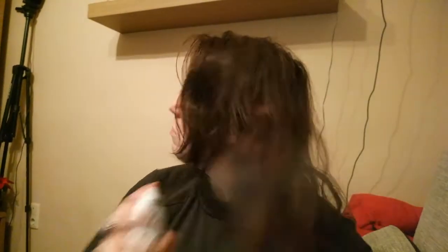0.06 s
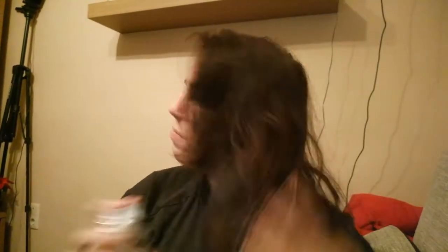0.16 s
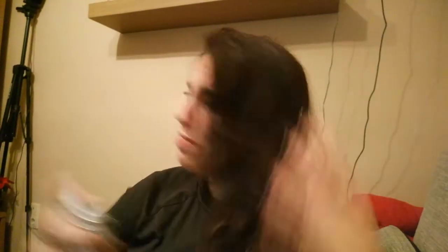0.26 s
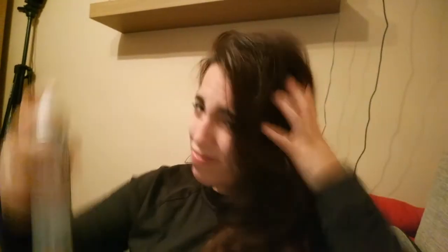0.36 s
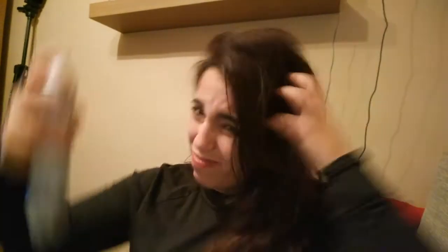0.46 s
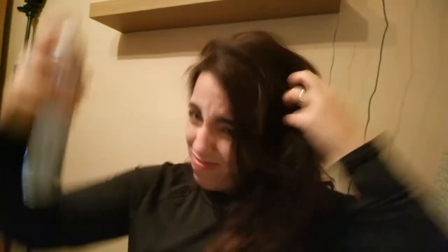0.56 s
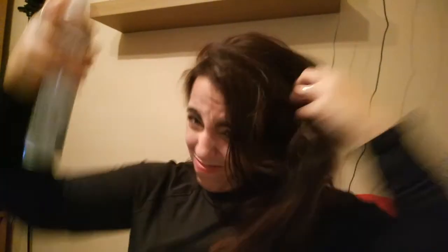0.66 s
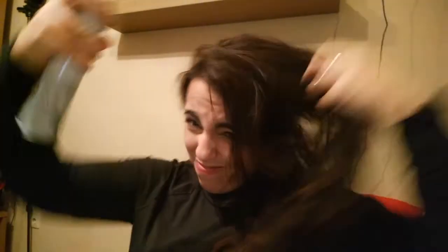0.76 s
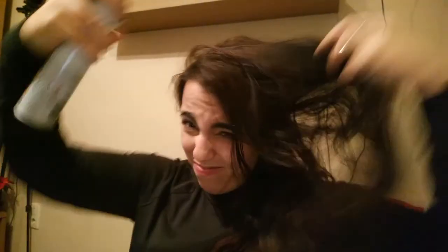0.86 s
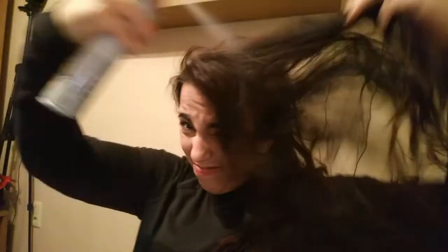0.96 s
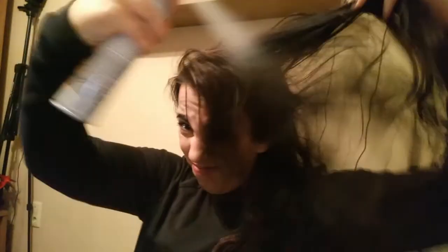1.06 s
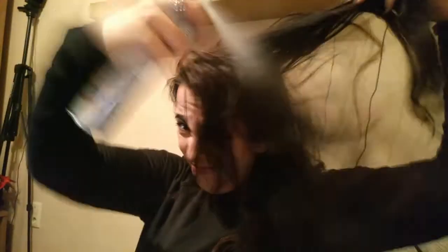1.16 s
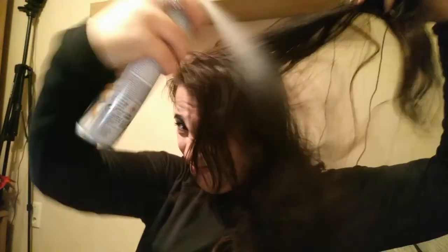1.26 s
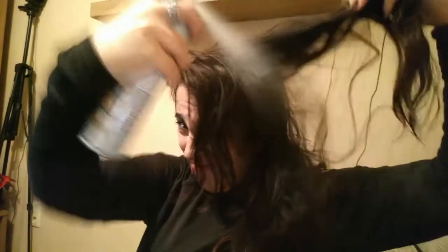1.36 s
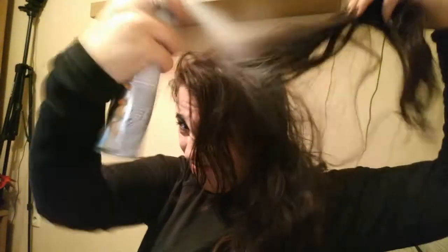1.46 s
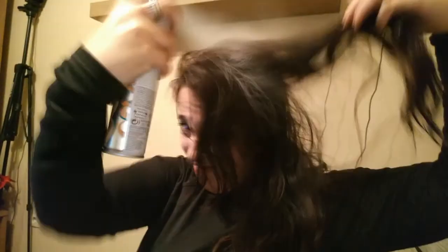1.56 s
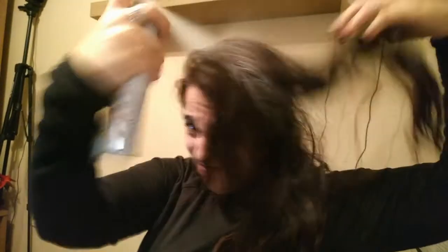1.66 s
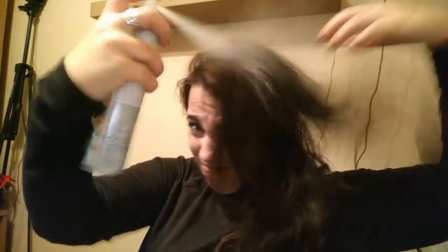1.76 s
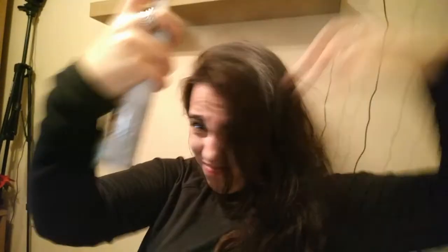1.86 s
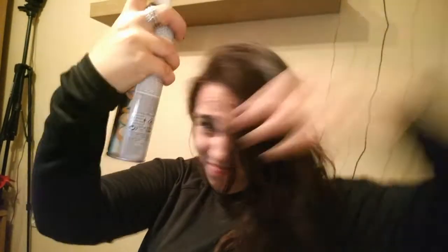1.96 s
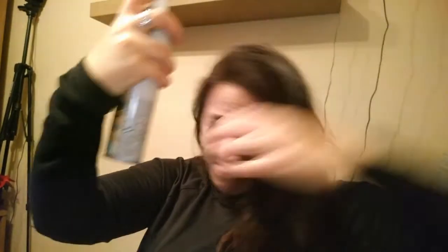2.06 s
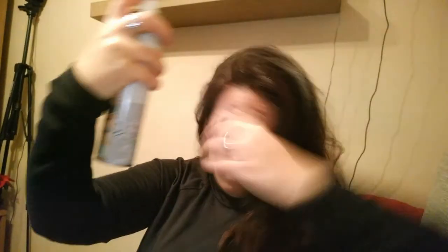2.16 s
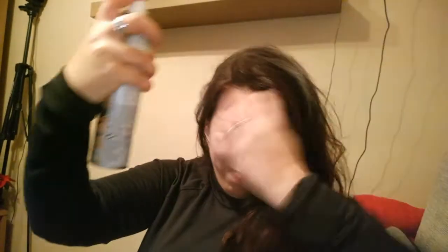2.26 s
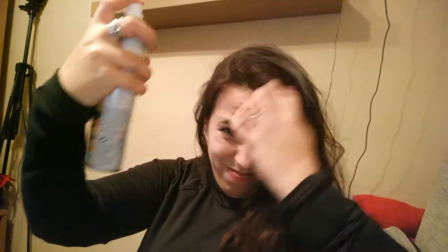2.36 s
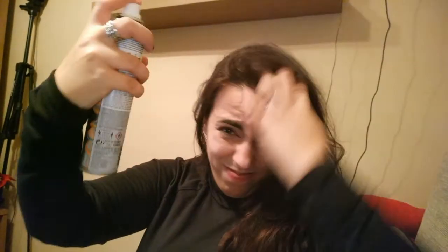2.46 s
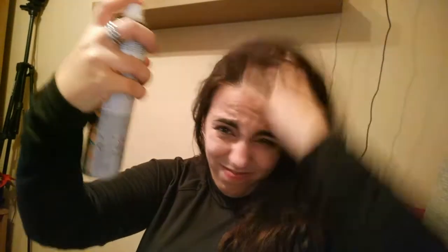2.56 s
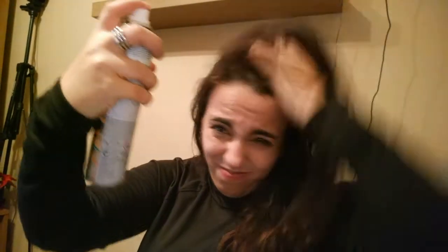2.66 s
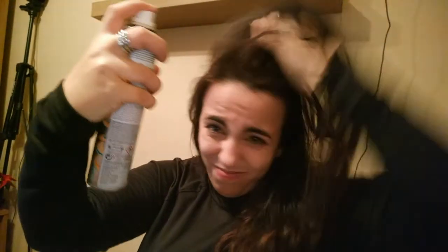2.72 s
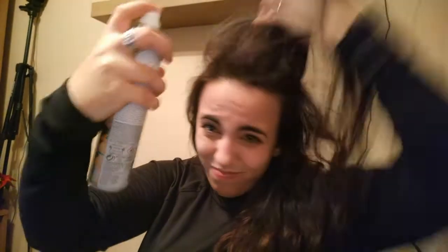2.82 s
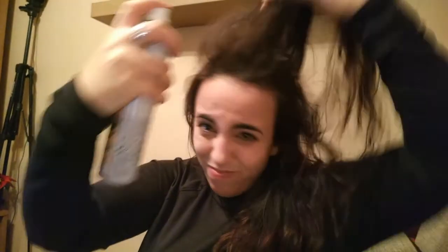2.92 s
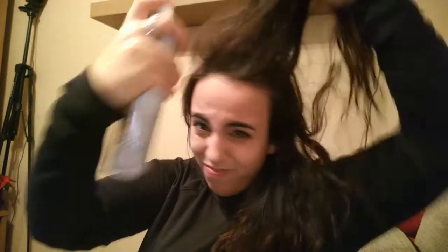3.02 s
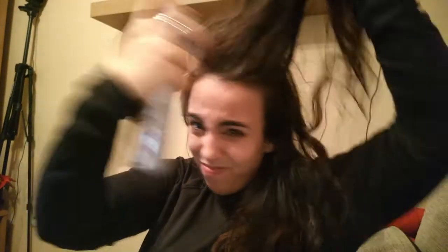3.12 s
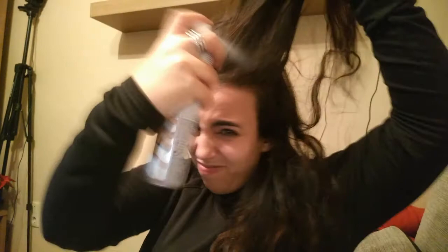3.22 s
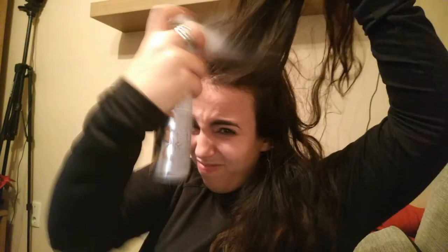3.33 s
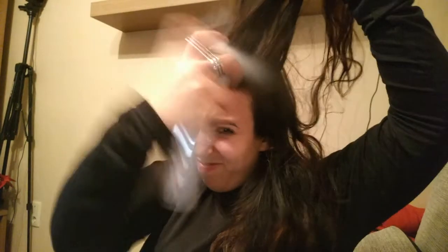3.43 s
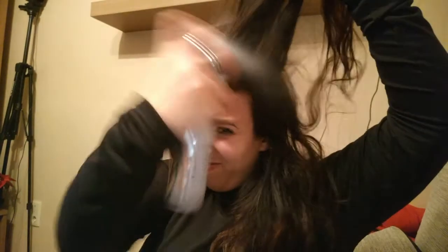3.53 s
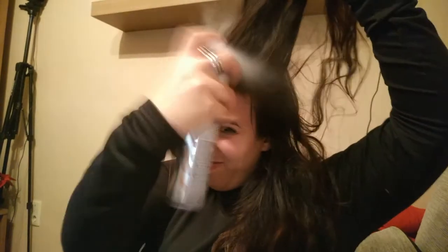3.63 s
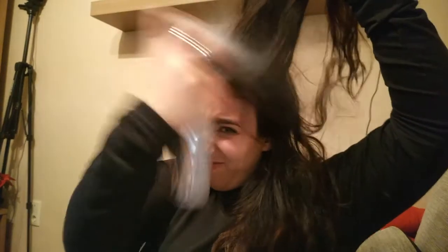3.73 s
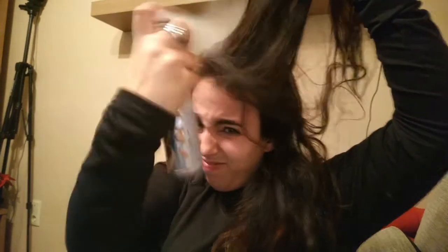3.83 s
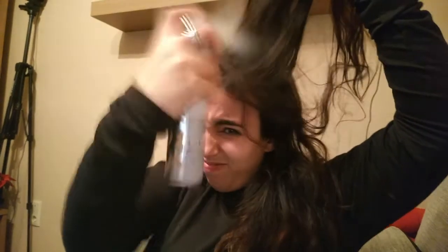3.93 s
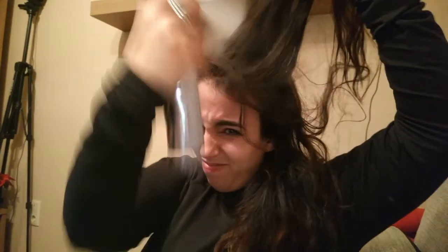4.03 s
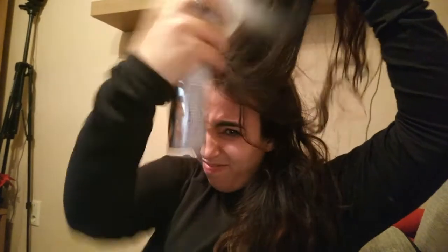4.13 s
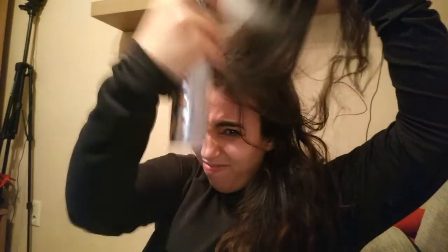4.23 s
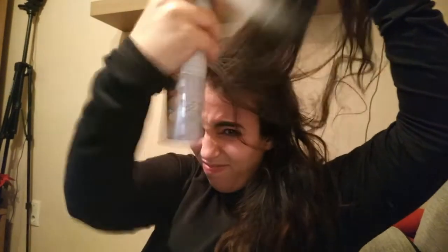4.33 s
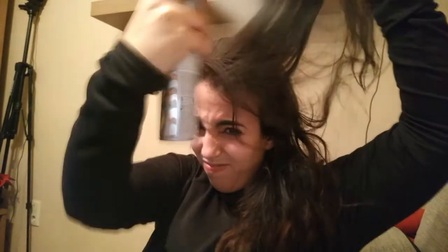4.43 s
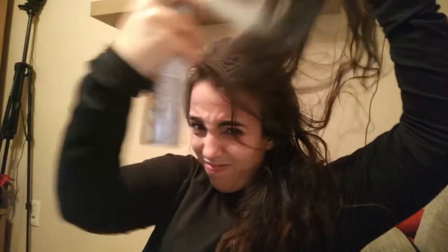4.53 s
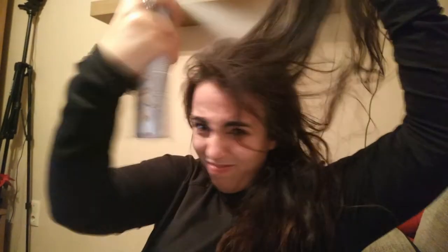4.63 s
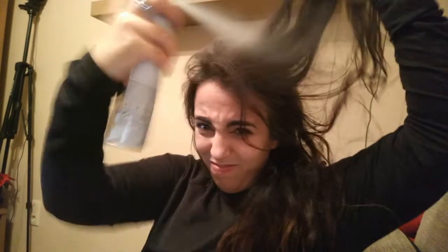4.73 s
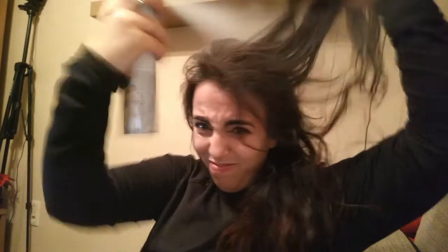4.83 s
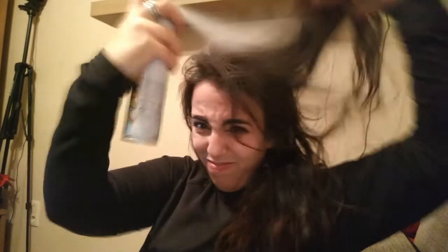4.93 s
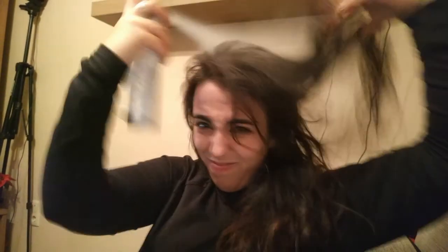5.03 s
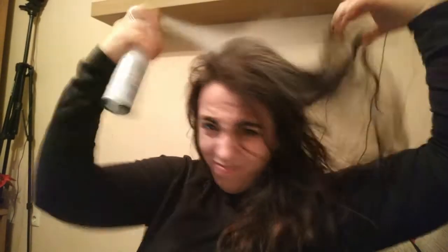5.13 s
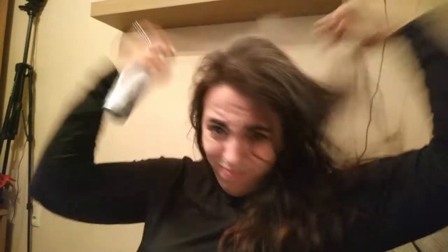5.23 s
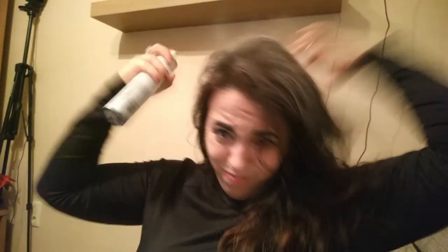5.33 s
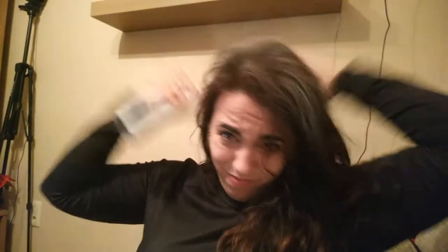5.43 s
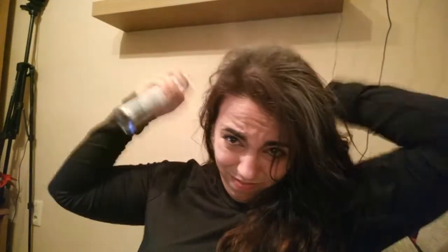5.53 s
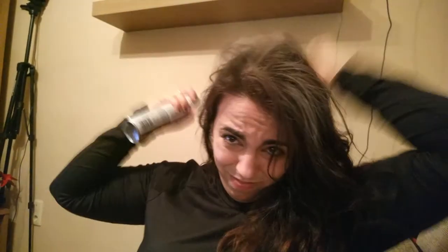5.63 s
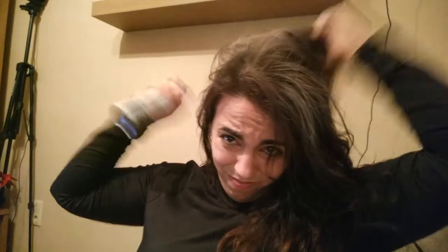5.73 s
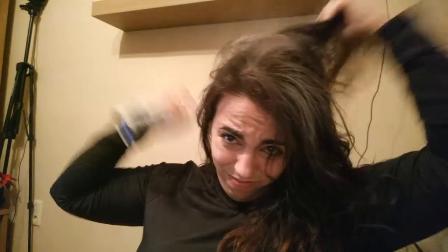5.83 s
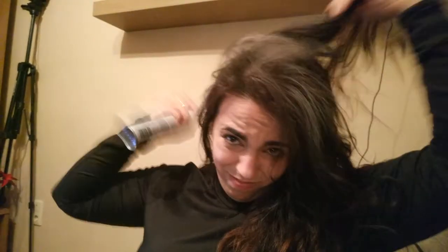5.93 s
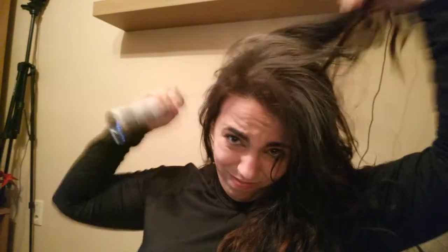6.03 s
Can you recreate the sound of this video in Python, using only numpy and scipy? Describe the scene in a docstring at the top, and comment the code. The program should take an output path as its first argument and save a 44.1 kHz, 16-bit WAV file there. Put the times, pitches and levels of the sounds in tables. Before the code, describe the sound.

In a small furnished room, an aerosol can hisses for under a second, spits once from its nozzle, then sprays long and steadily to the end.

```python
"""The echoes of a spray die away first; an aerosol can then sprays again in a small furnished room,
spits once from its nozzle and sprays a third time, up to the end, over a faint hush and thin fan tones.
Turbulent hiss is noise shaped by eddy size, sounded from several places along the plume; the hum is noise
through resonances of the air in the can. Decaying noise serves as the echoes that two ports receive
beside the direct sound; a sleeve, slaps of liquid and low flutter are noises under short envelopes."""
import sys
import numpy as np
from scipy import signal
from scipy.fft import rfft, irfft, next_fast_len
from scipy.io import wavfile
from scipy.ndimage import uniform_filter1d

SR = 44100
rng = np.random.default_rng(int(sys.argv[2]) if len(sys.argv) > 2 else 0)


def waveform_to_disk(signal):
    """Save audio, clipped to [-1, 1], as 16-bit WAV at the path in sys.argv[1]."""
    frames = np.transpose(np.atleast_2d(signal))
    scaled = np.clip(frames, -1, 1) * 32767
    samples = np.round(scaled).astype(np.int16)
    wavfile.write(sys.argv[1], SR, samples)


N = 268128
LEAD = int(.4 * SR)  # samples computed ahead of the audible start, and the length of the echoes
LONG = next_fast_len(N + LEAD)
TIME = (np.arange(LONG) - LEAD) / SR  # s from the audible start
HZ = np.maximum(np.fft.rfftfreq(LONG, 1 / SR), 1)
SIDES = np.array([[1], [-1]])  # left, right

# Small eddies at the nozzle. Each row: frequency in Hz, relative density in dB.
SMALL_EDDIES = [(5000, -41.5), (7000, -12), (8200, -6), (9000, -1), (9900, 1.5), (10600, -0.5),
                (12300, -4.5), (15100, -4.5), (16500, -7)]
# Large eddies down the plume. Each row: frequency in Hz, relative density in dB.
LARGE_EDDIES = [(60, -51), (110, -37), (206, -19), (340, -15), (820, -5), (1150, -9.5), (2000, -5.5),
                (3500, -5), (5400, -4), (7000, -.5), (8500, -4), (10500, -7), (13000, -14.5),
                (16500, -18.5)]
# Colouring by surfaces near by. Each row: centre in Hz, width in Hz, gain in dB.
SURFACE_RIPPLE = [(1450, 260, 3.5), (2010, 230, 4), (2733, 85, -4), (3650, 800, 3), (4540, 720, 2)]
# Resonances of the air in the can, before the hum is repitched. Each row: centre in Hz, width in Hz,
# relative gain in dB.
CAN_AIR = [(820, 95, 0), (680, 110, -11), (960, 120, -12)]
# Presses of the button. Each row: valve cracks in seconds, first flow in dB, valve opens fully in seconds,
# finger lifts in seconds, full-flow fine hiss in dB.
BUTTON_PRESSES = [(-.9, -26, -.8, -.04, -24.5), (.934, -26, .997, 1.8, -20.4),
                  (3.103, -38, 3.174, 6.3, -19.3)]
# Where the waved can points. Each row: time in seconds, dulling of the coarse hiss as it turns away in dB,
# left minus right in dB, hum pitch in Hz, level of the lower treble in dB.
CAN_AIM = [(-.1, 3, 5, 820, 1), (.95, 1, 4, 820, 0), (1.05, 2, 2, 830, 0), (1.3, 0, 1, 825, 0),
           (1.6, 2, 1.5, 840, -1), (1.85, 1.5, 2.5, 820, -1), (3.1, -1, 5, 820, 0), (3.25, .5, 0, 825, 0),
           (3.5, 0, -.5, 835, -.5), (3.75, .5, -.5, 785, 0), (3.98, 1, -.5, 850, .5),
           (4.15, 3, -1, 740, .5), (4.3, 2.5, -.5, 780, .5), (4.45, 2, -.5, 840, 0),
           (4.9, 2.5, .5, 845, -.5), (5.15, 6.5, -.5, 790, -1), (5.4, 7, 0, 820, -5), (5.55, 8, 1, 790, -7),
           (5.8, 8.5, 1, 795, -5), (6.1, 8.5, 1.5, 820, -4)]
# Bands of the coarse hiss. Each row: lower edge in Hz, upper edge in Hz, dB lost per dB of dulling,
# own flicker in dB.
COARSE_HISS_BANDS = [(20, 1100, 1., 1.), (1100, 2200, 1.2, 1.2), (2200, 4400, .9, .8),
                     (4400, 6600, .55, 1.)]
# Likeness of the echoes at the two ports. Each row: frequency in Hz, left-right correlation.
ECHO_LIKENESS = [(60, .4), (130, 0.72), (290, 0.98), (640, 0.77), (1400, 0.63), (3100, 0.5), (6800, 0.25),
                 (15000, .02)]
# The ports face different ways. Each row: frequency in Hz, left minus right in dB.
PORT_LEVELS = [(60, 0), (200, -13), (700, -5.5), (1300, -10.5), (2400, -5), (4400, -10.5), (8100, -1),
               (10500, 2.5), (15000, 4)]
# Unequal bass cuts of the ports. Each row: frequency in Hz, phase by which left leads in radians.
PORT_LEADS = [(60, 2.2), (130, 1.8), (260, 1.4), (500, 0.25), (860, 0.088), (16000, 0)]
# Spectrum of the spit. Each row: frequency in Hz, relative density in dB.
SPIT_SPECTRUM = [(590, -50), (1000, -26), (1770, -19), (2400, -16), (3000, -7), (3980, 0), (5600, -3),
                 (6800, -8), (8200, -2), (10500, -6), (13400, -22), (16000, -34)]
# The valve seat lets go. Each row: start in seconds, level before the envelope in dB.
VALVE_TICKS = [(2.4952, -46), (2.4985, -35), (2.5028, -25)]
# Liquid slaps the shaken can. Each row: start in seconds, level before the envelope in dB.
LIQUID_SLAPS = [(5.375, -34.5), (5.43, -34), (5.585, -47), (5.845, -48)]
# Resonances of the slaps. Each row: centre in Hz, width in Hz, relative gain in dB.
SLAP_BODY = [(228, 60, 0), (480, 300, -14)]
# Flutter as the spray stirs the air. Each row: time of the peak in seconds, level in dB.
AIR_GUSTS = [(3.23, -55), (3.41, -56), (3.67, -58)]
# Spectrum of the hush. Each row: frequency in Hz, relative density in dB.
HUSH_SPECTRUM = [(24, -40), (60, -36), (115, -31), (176, -4), (276, -4), (305, -13), (337, -5.5),
                 (467, -7.5), (646, -7), (733, -10), (1900, -15), (2150, -20), (9220, -21.5),
                 (16000, -23.5)]
# Stronger parts of the hush. Each row: centre in Hz, width in Hz, gain in dB.
HUSH_PEAKS = [(272, 20, 8.5), (650, 45, 7.5), (9900, 3100, 6.5)]
# Likeness of the hush at the two ports. Each row: frequency in Hz, left-right correlation.
HUSH_CORRELATION = [(60, -0.17), (130, -0.34), (290, -0.033), (640, 0.4), (1410, 0.0043), (3100, -0.078),
                    (6820, -0.09), (15000, 0.02)]
# Balance of the hush. Each row: frequency in Hz, left minus right in dB.
HUSH_LEVELS = [(60, -4.0), (110, -9.5), (200, -4), (380, 3.5), (700, -2), (1290, -2.5), (2380, -2.5),
               (4400, -3), (8120, 2.0), (15000, 4)]
# Moments when cloth and hair move more. Each row: time of the peak in seconds, level in dB.
CLOTH_STIRS = [(.45, -76), (2.25, -66), (2.85, -72)]
# Tones of a small fan. Each row: multiple of the fan frequency, level in dB.
FAN_PARTIALS = [(1, -78), (2, -76), (3, -81), (4, -79), (5, -83)]

LEAK_S, LEAK_START_DB, LEAK_END_DB = .03, -62, -50  # a thread of gas escapes before the valve cracks
CRACK_S, STEP_S, CLOSE_S = .012, .012, .03
PART_OPEN_DB, CLOSING_DB = -4.5, -4  # against full flow
HUM_PART_OPEN_DB, COARSE_CLOSING_DB = -14, -6  # further loss of hum and of coarse hiss
COARSE_DB, HUM_DB = -6.2, -19.5  # against the fine hiss
HUM_PER_DULLING, FINE_PER_DULLING = .9, .12  # dB lost per dB of dulling
LOWER_TREBLE_HZ = 6600, 8700
ROOM_T60_S, TREBLE_T60_S, DIRECT_DB = .22, .26, -2.8
SPIT_S, SPIT_DB, SPIT_RISE_S, SPIT_FALL_S = 2.499, -30, .004, .006
SPIT_TAIL_DB, SPIT_TAIL_S = -41, .04  # the last gas seeps out
SPIT_PAN_DB = 8  # half of left minus right is applied to each port
RUSTLE_S, RUSTLE_DB, RUSTLE_SWELL_S = .43, -53.5, .028
GUST_SWELL_S = .04
HUSH_DB, STIR_DB, STIR_SWELL_S = -57.5, -70, .15
FAN_HZ, MAINS_HZ, MAINS_DB = 171.2, 121, -89
TOP_HZ = 15730


def spray(count=8):
    """Turbulent jet noise: small eddies hiss high, large ones lower, and the enclosed air resonates."""
    # droplets make the whole flow sputter
    sputter_db = 1.2 * walk(150) + 0.62 * walk(25.26) + .3 * walk(7)
    aim_s, *aim = np.transpose(CAN_AIM)
    dull_db, pan_db, hum_hz, treble_db = (np.interp(TIME, aim_s, column) for column in aim)
    fine, coarse, hum = sum(valve(*press) for press in BUTTON_PRESSES)
    hiss = fine_hiss(fine, dull_db, treble_db, count) + coarse_hiss(coarse, dull_db, count)
    hiss = hiss + can_hum(hum, hum_hz, dull_db, count)
    # the plume wanders among the places while its shares keep the same total power
    share = undb([9.85 * walk(4) for _ in range(count)])
    share /= np.sqrt(np.sum(share ** 2, axis=0))
    return room(hiss * share * undb(sputter_db)) * undb(SIDES * pan_db / 2)


def fine_hiss(flow, dull_db, treble_db, count):
    """Treble turbulence in two bands: the upper dulls slightly with aim, the lower has its own level."""
    low_hz, high_hz = LOWER_TREBLE_HZ
    upper_level = flow * undb(0.39 * walk(11) - FINE_PER_DULLING * dull_db)
    lower_level = flow * undb(1.1 * walk(14) + treble_db)
    upper = jet_band(high_hz, SR, count) * upper_level
    return upper + jet_band(low_hz, high_hz, count) * lower_level


def coarse_hiss(flow, dull_db, count):
    """Directional turbulence: each band loses its own amount as the can turns away, and wavers alone."""
    hiss = 0
    for low_hz, high_hz, loss, flicker_db in COARSE_HISS_BANDS:
        level = flow * undb(flicker_db * walk(13) - loss * dull_db)
        hiss = hiss + jet_band(low_hz, high_hz, count) * level
    return hiss


def can_hum(flow, hum_hz, dull_db, count):
    """Cavity resonance: the air rings, and its pitch follows the liquid shifting in the tilting can."""
    # the resonant noise is played faster or slower to move its pitch
    place = np.cumsum(hum_hz / CAN_AIR[0][0])
    steady = noise(ring(CAN_AIR), count)
    tones = np.array([np.interp(place, np.arange(LONG), x, period=LONG) for x in steady])
    return tones * (flow * undb(HUM_DB - HUM_PER_DULLING * dull_db + 1.4 * walk(9)))


def jet_band(low_hz, high_hz, count):
    """Power addition: one band of the summed spectra of small and large eddies."""
    small = undb(over_hz(SMALL_EDDIES))
    large = undb(over_hz(LARGE_EDDIES) + bumps_db(SURFACE_RIPPLE))
    small = small / np.linalg.norm(small)
    large = large / np.linalg.norm(large) * undb(COARSE_DB)
    gain = np.hypot(small, large) * band(low_hz, high_hz)
    return np.linalg.norm(gain) * noise(gain, count)


def valve(crack_s, first_db, open_s, lift_s, full_db):
    """Flow control: leak, part open, full flow and closing set the gains of fine hiss, coarse hiss and hum."""
    s = [crack_s - LEAK_S, crack_s, crack_s + CRACK_S, open_s, open_s + STEP_S, lift_s, lift_s + CLOSE_S]
    db = [LEAK_START_DB, LEAK_END_DB, first_db, full_db + PART_OPEN_DB, full_db, full_db, full_db + CLOSING_DB]
    fine_db = np.interp(TIME, s, db, -200, -200)
    # the plume collapses first on closing; the hum is strong at full flow only
    coarse_db = np.interp(TIME, s[-2:], [0, COARSE_CLOSING_DB])
    hum_db = np.interp(TIME, s[-4:], [HUM_PART_OPEN_DB, 0, 0, HUM_PART_OPEN_DB])
    return undb([fine_db, fine_db + coarse_db, fine_db + hum_db])


def room(places):
    """Reverberation: every place reaches both ports directly and by its own decaying swarm of echoes."""
    t = np.arange(LEAD) / SR
    treble = 1 / (1 + (6000 / HZ) ** 4)
    fades = np.array([undb(-60 * t / t60) for t60 in (ROOM_T60_S, TREBLE_T60_S)])
    fades /= np.sqrt(np.sum(fades ** 2, axis=1, keepdims=True))
    direct, mid, side = 0, 0, 0
    for source in rfft(places):
        low, high = rfft(rng.standard_normal((2, LEAD)) * fades[:, None], LONG)
        echoes = source * (low + treble * (high - low))
        # up to 12 samples between the ports, half of it early and half late
        lag = np.exp(-1j * np.pi * HZ * rng.uniform(-12, 12) / SR)
        direct = direct + source * np.array([lag, lag.conj()])
        mid, side = mid + echoes[0], side + echoes[1]
    port_gain = undb(SIDES * over_hz(PORT_LEVELS) / 2)
    port_turn = np.exp(.5j * SIDES * over_hz(PORT_LEADS))
    heard = undb(DIRECT_DB) * direct + pair(mid, side, ECHO_LIKENESS)
    return irfft(heard * port_gain * port_turn, LONG)


def nozzle_spit():
    """Transient release: a sputtering puff of gas with a slower tail, after ticks of the valve seat."""
    puff = bursts([(SPIT_S, SPIT_DB)], SPIT_RISE_S, SPIT_FALL_S)
    puff = puff + bursts([(SPIT_S, SPIT_TAIL_DB)], SPIT_RISE_S, SPIT_TAIL_S)
    # four places; halving each keeps their summed power at one
    spit = puff * noise(undb(over_hz(SPIT_SPECTRUM)), count=4) * undb(2.7 * walk(400)) / 2
    # the ticks are so short that their direct sound stands alone
    tick_gain = ring([(4600, 4000, -1), (8400, 3000, 0), (14000, 5000, -16)])  # Hz, width Hz, dB
    ticks = bursts(VALVE_TICKS, .0003, .0011) * noise(tick_gain)
    return (room(spit) + ticks) * undb(SIDES * SPIT_PAN_DB / 2)


def liquid_slaps():
    """Impact: liquid slaps the can, as short bursts of resonant noise."""
    return room(bursts(LIQUID_SLAPS, .02, .02) * noise(ring(SLAP_BODY), count=2))


def air_gusts():
    """Aerodynamic flutter: the stirred air swells briefly as low-pitched noise."""
    envelope = sum(swell(s, db, GUST_SWELL_S) for s, db in AIR_GUSTS)
    return room(envelope * noise(peak(230, 170) ** 2, count=2))


def sleeve_rustle():
    """Friction: a sleeve brushes past as one swell of broad, treble-rich noise."""
    gain = undb(over_hz(SMALL_EDDIES)) + undb(-12)  # the second term is a flat floor
    return room(swell(RUSTLE_S, RUSTLE_DB, RUSTLE_SWELL_S) * noise(gain))


def hush():
    """Diffuse background: ventilation and far-off house noise, partly alike at the two ports."""
    mid, side = rfft(noise(undb(over_hz(HUSH_SPECTRUM) + bumps_db(HUSH_PEAKS)), count=2))
    ports = undb(SIDES * over_hz(HUSH_LEVELS) / 2)
    both = irfft(pair(mid, side, HUSH_CORRELATION) * ports, LONG)
    return both * undb(HUSH_DB + .4 * walk(12))


def cloth_stir():
    """Weak friction: a faint stir of cloth and hair comes and goes, unrelated at the two ports."""
    moving = undb(STIR_DB) + sum(swell(s, db, STIR_SWELL_S) for s, db in CLOTH_STIRS)
    return moving * noise(peak(1400, 2800), count=2) * undb(1.5 * walk(30))


def fan():
    """Periodic sources: harmonics of a small fan waver in pitch and level beside a steady mains tone."""
    turn = 2 * np.pi * np.cumsum(FAN_HZ * (1 + .002 * walk(2))) / SR
    tones = undb(MAINS_DB) * np.sin(2 * np.pi * MAINS_HZ * TIME)
    for multiple, db in FAN_PARTIALS:
        phase = rng.uniform(0, 2 * np.pi)
        tones = tones + undb(db + 2.5 * walk(5)) * np.sin(multiple * turn + phase)
    return np.sqrt(2) * tones * undb(SIDES * -1.5)  # right is 3 dB stronger


def undb(db):
    """Decibel law: dB to amplitude gain."""
    return np.exp(np.asarray(db) * (np.log(10) / 20))


def over_hz(table):
    """Logarithmic frequency: a (Hz, value) table interpolated at every frequency bin."""
    hz, value = np.transpose(table)
    return np.interp(np.log(HZ), np.log(hz), value)


def peak(hz, width):
    """Resonance curve of a simple oscillator, 1 at its centre."""
    return 1 / (1 + ((HZ - hz ** 2 / HZ) / width) ** 2)


def bumps_db(modes):
    """Cascaded resonances: summed dB of (Hz, width Hz, dB) rows."""
    return sum(db * peak(hz, width) for hz, width, db in modes)


def ring(modes):
    """Parallel resonances: summed gain of (Hz, width Hz, dB) rows."""
    return sum(undb(db) * peak(hz, width) for hz, width, db in modes)


def band(low_hz, high_hz):
    """Power-complementary filter: a band whose power adds to 1 with its neighbours."""
    above = lambda hz: 1 / (1 + (hz / HZ) ** 12)
    return np.sqrt(np.maximum(above(low_hz) - above(high_hz), 0))


def noise(gain, count=1):
    """Random-phase synthesis: unrelated noises of the given spectral gain, joint rms 1."""
    real, imaginary = rng.standard_normal((2, count, len(HZ)))
    x = irfft((real + 1j * imaginary) * gain, LONG)
    return x / np.sqrt(np.mean(x ** 2))


def walk(rate):
    """Slow random modulation: levels held 1 / rate seconds and smoothed twice; spread 1."""
    hold = int(SR / rate)
    x = np.repeat(rng.standard_normal(LONG // hold + 1), hold)
    x = uniform_filter1d(uniform_filter1d(x, hold), hold)[:LONG]
    return x / x.std()


def pair(mid, side, likeness):
    """Partial coherence: left and right spectra from two unrelated ones, as alike as the table says."""
    c = np.clip(over_hz(likeness), -.95, .95)
    return mid * np.sqrt((1 + c) / 2) + SIDES * side * np.sqrt((1 - c) / 2)


def bursts(events, rise_s, fall_s):
    """Exponential relaxation: envelope of (s, dB) events that rise and fall."""
    out = np.zeros(LONG)
    for s, db in events:
        t = np.maximum(TIME - s, 0)
        out += undb(db) * (1 - np.exp(-t / rise_s)) * np.exp(-t / fall_s)
    return out


def swell(s, db, width_s):
    """Symmetric exponential envelope that grows to a peak and shrinks as fast."""
    return undb(db) * np.exp(-np.abs(TIME - s) / width_s)


def scene():
    """Superposition: all sources add, from the audible start on."""
    small_sounds = nozzle_spit() + liquid_slaps() + air_gusts() + sleeve_rustle()
    background = hush() + cloth_stir() + fan()
    return (spray() + small_sounds + background)[:, LEAD:LEAD + N]


def record(dry):
    """Band limiting: the recorder cuts the bass and the top."""
    dry = signal.sosfilt(signal.butter(2, 70, "high", fs=SR, output="sos"), dry)
    return signal.sosfilt(signal.ellip(12, .2, 80, TOP_HZ, fs=SR, output="sos"), dry)


dry = scene()
out = record(dry)
waveform_to_disk(out)
```